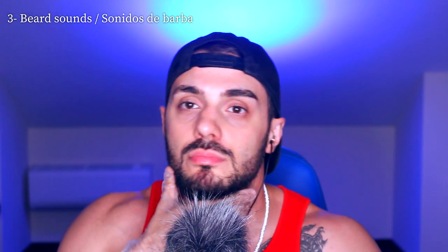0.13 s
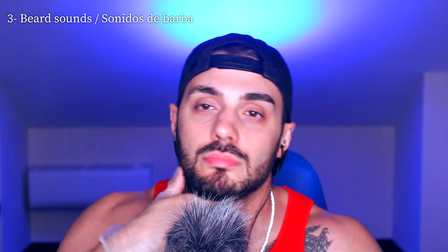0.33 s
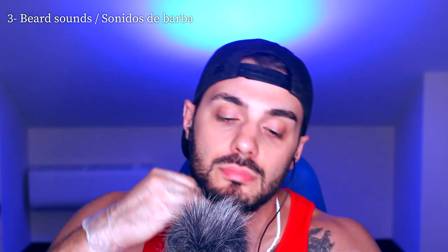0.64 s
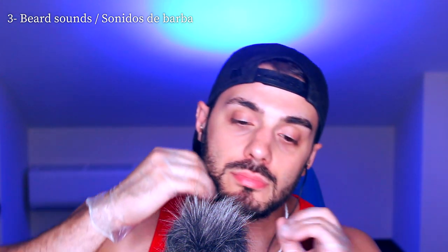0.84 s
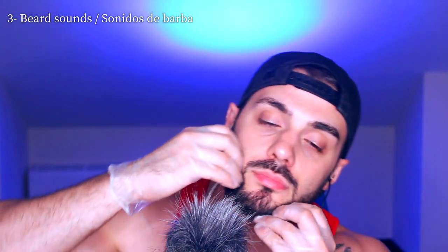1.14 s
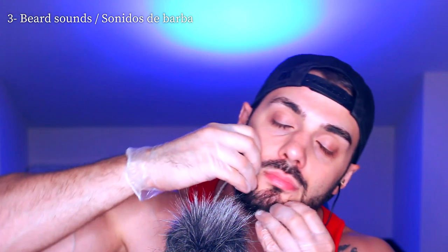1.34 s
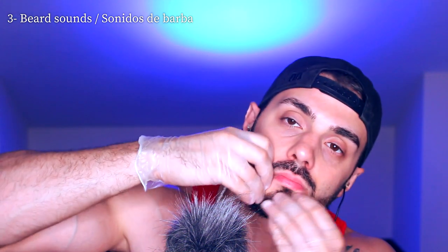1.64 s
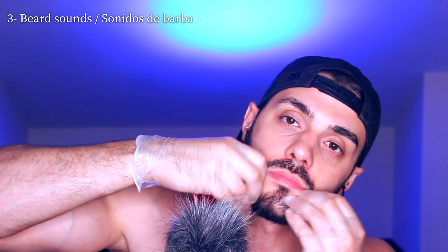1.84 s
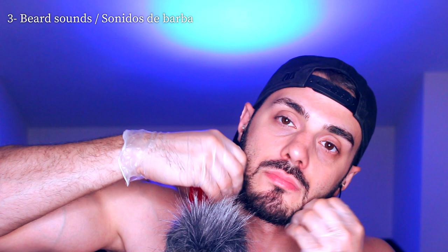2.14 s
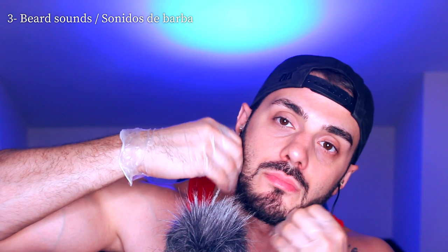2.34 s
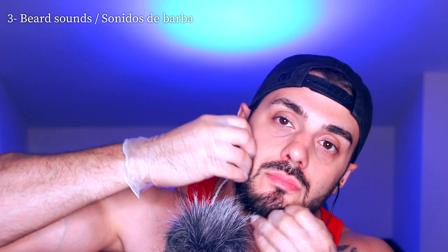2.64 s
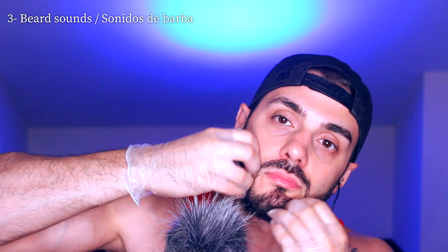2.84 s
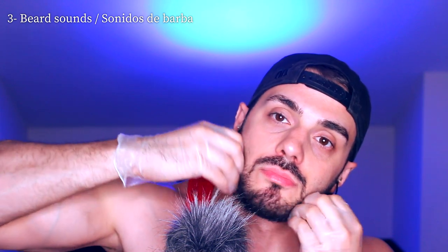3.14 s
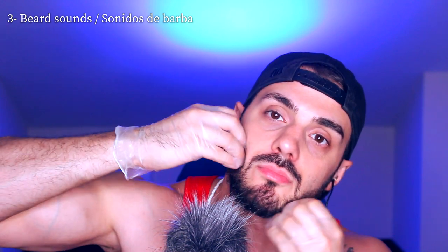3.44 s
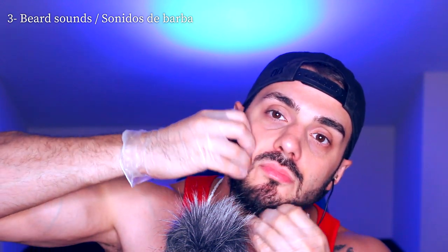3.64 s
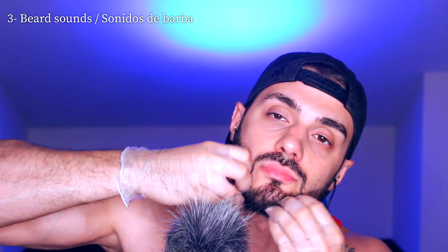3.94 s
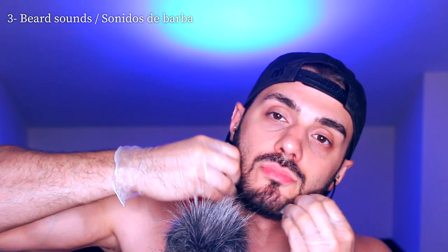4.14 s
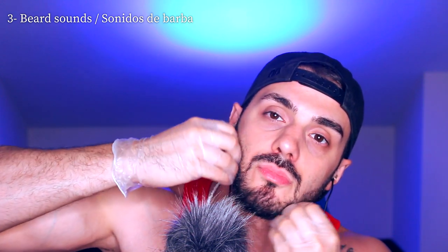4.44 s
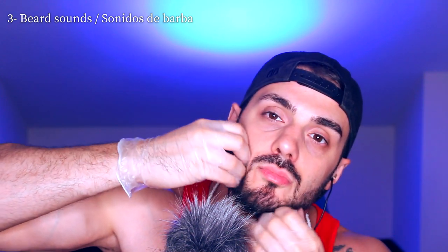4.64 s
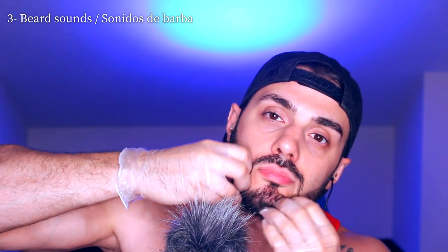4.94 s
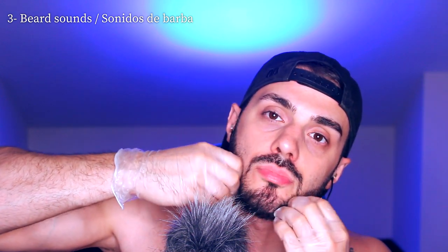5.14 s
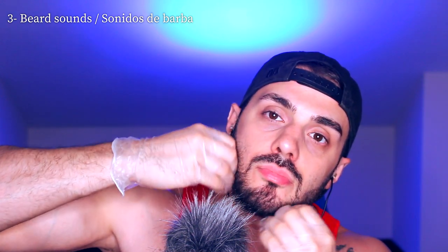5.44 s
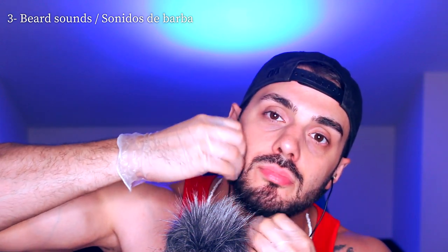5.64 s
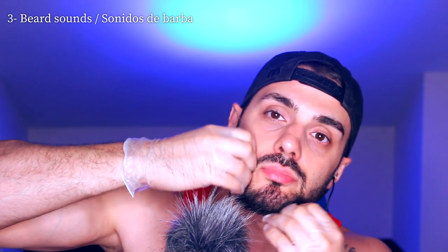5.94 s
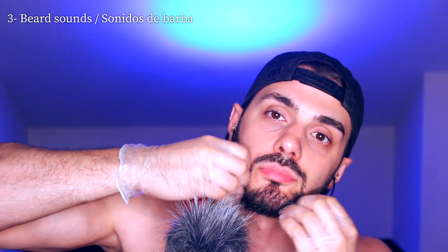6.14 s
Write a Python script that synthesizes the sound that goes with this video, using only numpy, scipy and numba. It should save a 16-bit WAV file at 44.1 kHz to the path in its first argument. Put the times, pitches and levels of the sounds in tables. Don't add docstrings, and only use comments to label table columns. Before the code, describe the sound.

Very close, dry beard scratching in quick strokes, bright bristly crackles and sharp tiny snaps leaning right, with faint glove rub and room hum beneath.

```python
import sys
import numpy as np
from scipy import signal
from scipy.fft import rfft, irfft
from scipy.io import wavfile
from scipy.ndimage import uniform_filter1d
from numba import njit

SR = 44100
rng = np.random.default_rng(int(sys.argv[2]) if len(sys.argv) > 2 else 0)


def master_out(mix):
    frames = np.transpose(np.atleast_2d(mix))
    ceiling = np.clip(frames, -1, 1)
    pcm = np.round(ceiling * 32767).astype(np.int16)
    wavfile.write(sys.argv[1], SR, pcm)


def voltage_ratio(level):
    return 10 ** (np.asarray(level, float) / 20)


N = 276948
T = np.arange(N) / SR

# (start_s, left_minus_right_db, glove_drag_db)
HANDS = [(0.0, -5, -57.5), (0.12, -1.5, -60), (0.79, -1, -61), (2.17, -11.5, -57.5), (2.73, -3.5, -59.5),
         (3.15, -10, -60.5), (3.39, -12.5, -55), (3.5, -11, -61.5), (3.76, -1, -59), (3.92, -4, -59),
         (4.2, -13, -59), (4.56, -4, -61), (4.83, -5.5, -56.5), (5.25, -10, -60.5), (5.51, -10, -58.5),
         (5.77, -2.5, -56), (6.21, -9, -60.5), (6.28, -11, -58)]
HAIR_LEAN = 1.35
USUAL_STROKE_DB = -34.5
UNDER_CHIN_S, UNDER_CHIN_DB = 1.05, -4


def curves(table):
    s, *columns = np.transpose(table)
    return [np.interp(T, s, column) for column in columns]


def walk(rate):
    k = int(SR / rate)
    held = np.repeat(rng.standard_normal(N // k + 1), k)
    return 0.74 * uniform_filter1d(uniform_filter1d(held, k), k)[:N]


def coloured(x, colour):
    hz, db = np.transpose(colour)
    log_hz = np.log(np.fft.rfftfreq(N, 1 / SR) + 1e-3)
    gain = voltage_ratio(np.interp(log_hz, np.log(hz), db, left=-99, right=-99))
    y = irfft(rfft(x) * gain, N)
    return y / np.sqrt(np.mean(y ** 2))


def wide_noise(colour, side, lag=0):
    mid, other = rng.standard_normal((2, N))
    left = np.roll(mid, lag) + side * other
    right = mid - side * other
    return coloured(np.array([left, right]), colour)


@njit
def rings(peak, hz, sharp, size, phase):
    out = np.zeros(N + 2000)
    for k in range(len(peak)):
        tau = sharp[k] * SR / (np.pi * hz[k])
        start = max(peak[k] - tau, 0.)
        s = 2j * np.pi * hz[k] / SR - 1 / tau
        i = int(start) + 1
        z = size[k] * np.exp(1 + 1j * phase[k] + s * (i - start)) / tau
        turn = np.exp(s)
        for j in range(min(500, int(9 * tau))):
            out[i + j] += z.imag * (i + j - start)
            z *= turn
    return out[:N]


def left_lag(s):
    return np.where(s > 1.1, 6.1, .7)


def heard(s, hz, sharp, db, pan_db, lag, echo_db, count=3):
    chance = rng.random((len(s), 1 + 4 * count)).T
    phase = 2 * np.pi * chance[0]
    left = rings(s * SR + lag, hz, sharp * 1.168, voltage_ratio(db + pan_db / 2), phase)
    right = rings(s * SR, hz, sharp, voltage_ratio(db - pan_db / 2), phase)
    out = np.array([left, right])
    for k in range(2 * count):
        late_s = 0.000182 + .003 * chance[1 + 2 * k] ** 2
        lean_db = (.5 - k % 2) * pan_db * 0.057
        size = voltage_ratio(db + lean_db + echo_db - 1200 * late_s)
        echo_phase = 2 * np.pi * chance[2 + 2 * k]
        out[k % 2] += rings((s + late_s) * SR, hz, sharp * 1.2, size, echo_phase)
    return out


def strokes():
    # (start_s, length_s, level_db, brightness_db)
    stroke_list = [(-0.13, 0.17, -42.5, 21), (0.121, 0.087, -36, 3), (0.32, 0.3, -37, 8),
                   (0.531, 0.076, -34, 1), (0.615, 0.077, -39, 0), (0.685, 0.11, -39.5, -0.5),
                   (0.774, 0.23, -38.5, 2), (1.057, 0.39, -39.5, 7), (1.26, 0.072, -38, 7),
                   (1.435, 0.13, -36.5, 1), (1.656, 0.26, -38, 1), (2.013, 0.17, -44.5, 10),
                   (2.156, 0.086, -39, -4), (2.303, 0.18, -41.5, -0.5), (2.448, 0.064, -36.5, -4),
                   (2.526, 0.17, -37.5, 1.5), (2.704, 0.23, -36, 1), (2.88, 0.22, -35, 3),
                   (3.02, 0.15, -38, 6), (3.163, 0.13, -36.5, -1), (3.446, 0.16, -35.5, 9),
                   (3.67, 0.28, -37.5, 1), (3.87, 0.16, -38, 4), (4.006, 0.18, -37, 5),
                   (4.199, 0.19, -39, -3), (4.4, 0.38, -36.5, 2), (4.779, 0.23, -35.5, 0.5),
                   (5.006, 0.25, -39.5, 7), (5.314, 0.27, -43, 5), (5.567, 0.21, -43.5, -7),
                   (5.823, 0.27, -35, -0.5), (6.067, 0.17, -37.5, 8)]
    attack_s, release_s = 0.066, 0.047
    resting_db, resting_bright_db = -44, 5
    s, length, db, bright_db = np.transpose(stroke_list)[:, :, None]
    t = T[::100]
    shape = np.clip(np.minimum((t - s) / attack_s, (s + length + release_s - t) / release_s), 0, 1)
    progress = np.clip((t - s) / (length + release_s), 0, 1)
    db = db + 4.5 * (np.sin(np.pi * progress) - .7)
    power = (voltage_ratio(db) * np.sin(shape * np.pi / 2)) ** 2
    resting = voltage_ratio(resting_db) ** 2
    total = power.sum(axis=0) + resting
    brightness = ((power * bright_db).sum(axis=0) + resting * resting_bright_db) / total
    return np.interp(T, t, 10 * np.log10(total)), np.interp(T, t, brightness)


def hum():
    # (pitch_hz, level_db)
    mains = [(100.0, -52), (200.0, -79), (300.0, -72), (76.4, -70), (153.0, -67)]
    # (pitch_hz, level_db, wander_hz)
    fan = [(458, -79, 2.61), (500.6, -75, 2.85), (627, -75, 2.1), (879, -78, 2.66)]
    tones = [(hz, db, .04) for hz, db in mains] + fan
    out = np.zeros(N)
    for hz, db, wander in tones:
        turns = np.cumsum(hz + wander * walk(3)) / SR
        out += np.sqrt(2) * voltage_ratio(db) * np.sin(2 * np.pi * turns)
    return out


def arm():
    # (push_s, level_db)
    pushes = [(0.11, -28), (0.36, -38), (0.5, -30), (0.77, -33), (1.06, -27), (1.32, -42), (1.48, -48),
              (1.65, -33), (1.87, -34), (2.13, -35), (2.57, -40), (2.81, -34), (3.11, -46), (3.34, -39),
              (3.63, -37), (3.84, -32), (4.05, -30), (4.31, -25), (4.68, -27), (4.93, -28), (5.17, -28),
              (5.4, -31), (5.66, -27), (5.91, -29), (6.18, -33)]
    s, db = np.transpose(pushes)
    times = np.r_[s[0] - .25, s, s[-1] + .27]
    turns = uniform_filter1d(np.interp(T, times, np.arange(len(s) + 2)), size=5000)
    level = voltage_ratio(uniform_filter1d(np.interp(T, s, db), size=4000))
    push = np.sqrt(2) * level * np.cos(2 * np.pi * turns)
    return push * voltage_ratio(np.array([[-.6], [.6]]))


def shifts():
    # (middle_s, spread_s, stand_shudder_db, cloth_db, palm_db)
    shift_list = [(0, 0.022, -10, 3, 4), (.15, 0.057, 6, 1, -0.5), (.33, 0.039, -6, 14, 2),
                  (.59, 0.12, 6, 9.5, 7.5), (1.0, 0.087, 3, 7, 1), (1.8, 0.36, -3, 4, 4),
                  (2.3, .05, 2, -2, -5), (2.5, 0.16, 0.5, -1, -0.5), (5.4, .15, 1, 2.5, -1),
                  (3.4, 0.3, 2, 3, -1), (5.0, 0.22, 1, -0.5, 1), (5.87, 0.15, 0, 3.5, 7),
                  (6.2, 0.12, -1, -2.5, -1)]
    s, spread, *lifts_db = np.transpose(shift_list)[:, :, None]
    swell = np.exp(-.5 * ((T - s) / spread) ** 2)
    return [(swell * db).sum(axis=0) for db in lifts_db]


def rub():
    # (pitch_hz, level_db)
    glove_colour = [(900, -32), (1300, -14), (1900, -5.5), (2500, -8), (4000, -7), (6000, -19)]
    palm_colour = [(420, -49), (600, -2), (900, 0.5), (1300, 0), (1800, -5)]
    cloth_colour = [(70, -6), (110, 1.5), (150, -1.5), (185, -0.5), (300, 0), (500, -4.5), (620, -9),
                    (850, -26)]
    stand_colour = [(9, -14), (14, 2), (24, -2.5), (33, 1), (42, -15), (55, -18), (80, -17.5), (130, -36)]
    glove_db = 5.5 + curves(HANDS)[1] + 0.55 * (strokes()[0] - USUAL_STROKE_DB)
    stand_db, cloth_db, palm_db = np.array(shifts()) + [[-52.5], [-60.7], [-63.36]]
    lean = np.array([[-1], [1]])
    drag = walk(50)
    glove = wide_noise(glove_colour, 0.71, lag=3.3) * voltage_ratio(glove_db + 2.7 * drag + 1.35 * lean)
    palm_flicker_db = 2.0 * drag + 2.5 * walk(30)
    palm = wide_noise(palm_colour, 0.45, lag=3.7) * voltage_ratio(palm_db + palm_flicker_db + 1.7 * lean)
    cloth = wide_noise(cloth_colour, 0.23) * voltage_ratio(cloth_db + 1.1 * walk(25.17) + 0.93 * lean)
    stand = wide_noise(stand_colour, 0.39) * voltage_ratio(stand_db + .5 * lean)
    return glove + palm + cloth + stand


def beard(count=70000):
    hair_hz = (2750, 4800, 7600, 13300, 14760)
    hair_db = (-32, 8, 8.5, 7, 13)
    when, pitch, ring, big, side, place = rng.random((count, 6)).T
    at = (when * (N - 40)).astype(int)
    s = at / SR
    level_db, bright_db = (c[at] for c in strokes())
    hz = hair_hz[0] * (hair_hz[-1] / hair_hz[0]) ** pitch
    log_hz, log_points = np.log(hz), np.log(hair_hz)

    coarse_db = -2.5 - 0.69 * (level_db - USUAL_STROKE_DB) - bright_db
    fine_db = 0.5 + 0.21 * bright_db + UNDER_CHIN_DB * (s < UNDER_CHIN_S)
    coarse = np.interp(log_hz, log_points, [1, 1, 0, 0, 0])
    fine = np.interp(log_hz, log_points, [0, 0, 0, 1, 1])
    colour_db = np.interp(log_hz, log_points, hair_db) + coarse * coarse_db + fine * fine_db

    sharp = 1.1 + (1.6 + 4.5 * ring ** 2) * big ** .2
    size_db = np.minimum(-(3.8 - 1.2 * pitch ** 2) * np.log(big), 14)
    patch = sum(walk(14)[at] * np.cos(np.pi * k * pitch) for k in (2, 3, 5))
    size_db = size_db + .6 * patch + 1.6 * walk(180)[at]
    energy_db = 10 * np.log10(sharp * SR / hz)

    pan_db = HAIR_LEAN * curves(HANDS)[0][at] * (hz / 9000) ** 0.37 + 9 * (side - .5)
    lag_spread = np.interp(s, [.9, 1.4], [.6, 1.5])
    lag = np.interp(s, [.9, 1.4], [.6, 6.1]) - lag_spread * ((place < .35) + 1.1 * place)
    db = level_db - 5.0 + colour_db + size_db - energy_db
    return heard(s, hz, sharp, db, pan_db, lag, echo_db=-10)


def ticks(count=220):
    when, pitch, ring, big, side = rng.random((count, 5)).T
    at = (when * (N - 40)).astype(int)
    s = at / SR
    db = strokes()[0][at] + 9 - 1.5 * np.log(big).clip(-2)
    db = db + 2 * UNDER_CHIN_DB * pitch * (s < UNDER_CHIN_S)
    db = db + 3 * (pitch - .5)
    pan_db = HAIR_LEAN * curves(HANDS)[0][at] + 8 * (side - .5)
    return heard(s, 6000 * 2.0 ** pitch, .9 + 1.2 * ring, db, pan_db, left_lag(s), echo_db=-14)


def snaps():
    # (peak_s, peak_db, ring_hz)
    middling_catches = [(0.1947, -23, 10700), (0.219, -24, 7400), (0.5476, -23, 7900), (0.5797, -23, 8800),
                        (0.5937, -20, 7500), (0.7241, -22, 8200), (0.8116, -23, 8400), (0.8744, -22, 12600),
                        (0.9136, -22, 8700), (0.9629, -21, 8200), (0.9996, -21, 9800), (1.1046, -25, 9800),
                        (1.1331, -24, 12500), (1.149, -24, 10000), (1.245, -24, 9100), (1.2528, -26, 10700),
                        (1.2973, -27, 10400), (1.3149, -27, 10200), (1.4256, -28, 10300), (1.4871, -25, 10000),
                        (1.71, -24, 8000), (1.7582, -25, 10800), (1.7976, -21, 11300), (1.8227, -23, 9100),
                        (1.8549, -24, 12600), (1.8853, -25, 12100), (1.9219, -25, 11100), (2.0531, -23, 10100),
                        (2.0596, -29, 9600), (2.0711, -28, 11200), (2.0839, -26, 9900), (2.1249, -27, 9200),
                        (2.1293, -28, 10100), (2.2265, -24, 9200), (2.2442, -26, 11100), (2.3546, -27, 9400),
                        (2.405, -23, 9900), (2.5352, -24, 10000), (2.685, -24, 8700), (2.7937, -20, 8000),
                        (2.8144, -22, 12000), (2.853, -23, 7900), (2.9041, -25, 9300), (2.9134, -21, 10000),
                        (2.9273, -25, 10300), (2.9706, -23, 10100), (2.9812, -19, 11000), (3.0034, -21, 9400),
                        (3.079, -24, 9800), (3.1017, -23, 9200), (3.1355, -24, 10700), (3.1742, -25, 10500),
                        (3.2179, -22, 8000), (3.243, -21, 7700), (3.2533, -24, 9800), (3.2602, -22, 8000),
                        (3.2844, -23, 11400), (3.3094, -28, 10500), (3.4221, -27, 9000), (3.4465, -25, 10500),
                        (3.5039, -24, 10800), (3.5306, -21, 10100), (3.5408, -22, 11300), (3.5673, -23, 10200),
                    (3.5736, -23, 11400), (3.5793, -23, 10800), (3.5898, -22, 12500), (3.6498, -28, 10400),
                    (3.8303, -22, 9100), (3.9939, -25, 8800), (4.0318, -20, 9400), (4.0568, -29, 10000),
                    (4.125, -21, 10100), (4.137, -24, 9300), (4.2269, -25, 9100), (4.2983, -24, 10800),
                    (4.3271, -23, 9200), (4.3347, -22, 10500), (4.4029, -22, 9700), (4.4634, -25, 10100),
                    (4.4669, -21, 10200), (4.4788, -25, 10500), (4.5034, -19, 7700), (4.5276, -19, 9200),
                    (4.6181, -23, 9600), (4.6473, -20, 9700), (4.6531, -25, 11200), (4.6837, -24, 11200),
                    (4.7217, -22, 8500), (4.7328, -20, 11700), (4.7614, -22, 7000), (4.7682, -28, 11000),
                    (4.8229, -24, 6800), (4.8736, -26, 12700), (4.9231, -22, 10200), (5.1137, -26, 9000),
                    (5.1926, -27, 11800), (5.2577, -26, 9200), (5.2688, -31, 11100), (5.2825, -28, 9900),
                    (5.3152, -33, 9600), (5.3401, -28, 10700), (5.3862, -28, 10600), (5.6571, -25, 7700),
                    (5.6737, -20, 9100), (5.7439, -23, 8000), (5.8238, -24, 7400), (5.8714, -25, 11800),
                    (5.8999, -21, 11200), (5.9274, -23, 10700), (5.9907, -22, 8100), (6.0112, -20, 10300),
                    (6.056, -22, 9000), (6.1234, -25, 9000), (6.1519, -23, 10000), (6.1999, -22, 9400),
                    (6.2208, -29, 11500), (6.2473, -25, 10900), (6.2539, -23, 8900), (6.2627, -25, 11000)]
    # (peak_s, peak_db, ring_hz, left_minus_right_db)
    strong = [(0.5588, -20, 8600, -3), (0.5747, -19, 8000, -3), (0.6783, -17, 7200, 0),
              (0.7134, -18, 6900, -3), (0.7383, -19, 6800, 0), (0.8255, -20, 8900, -4),
              (1.1145, -22, 8800, -11), (1.2405, -26, 9400, -15), (1.3564, -20, 11000, -6),
              (1.4595, -21, 7900, -10), (1.5331, -19, 8500, -6), (1.6898, -13, 12500, -8),
              (2.1096, -22, 8700, -17), (2.2054, -22, 10100, -19), (2.2152, -19, 10900, -10),
              (2.2848, -19, 10100, -10), (2.3336, -20, 8900, -9), (2.4012, -19, 9300, -8),
              (2.4128, -22, 10900, -12), (2.4884, -20, 11000, -12), (2.4949, -18, 8800, -9),
              (2.9389, -11, 9300, 0), (3.1171, -18, 9400, -15), (3.295, -20, 8800, -11),
              (3.5004, -14, 10600, -12), (3.5193, -13, 10000, -13), (3.5519, -17, 10700, -16),
              (3.8944, -21, 13100, -17), (3.9875, -15, 9400, -8), (4.0715, -17, 11100, -15),
              (4.1154, -11, 9700, -13), (4.1519, -21, 8900, -15), (4.1891, -18, 9900, -15),
              (4.3211, -23, 11100, -20), (4.434, -23, 9600, -18), (4.455, -22, 9400, -18),
              (4.6279, -18, 9700, -9), (4.7437, -19, 9200, -6), (4.9074, -18, 10700, -7),
              (5.0828, -25, 12000, -18), (5.1826, -20, 9500, -14), (5.23, -24, 9800, -15),
              (5.5219, -24, 10800, -13), (5.562, -21, 11700, -10), (5.6677, -24, 11500, -13),
              (6.0083, -19, 10500, -11), (6.0258, -12, 8800, -10), (6.0348, -17, 9100, -10)]
    s, db, hz = np.transpose(middling_catches)
    catches = s, db, hz, 1.3 * curves(HANDS)[0][(s * SR).astype(int)]
    s, db, hz, pan_db = np.hstack([np.transpose(strong), catches])
    sharp = np.clip(1.8 * voltage_ratio(1.5 * rng.standard_normal(len(s))), .6, 6)
    lag = left_lag(s)
    ring = heard(s, hz, sharp, db + 2, pan_db, lag, echo_db=-15)
    crack_hz = np.minimum(hz * 1.4, 14500)
    return ring + heard(s, crack_hz, sharp, db - 10, pan_db, lag, echo_db=-16)


def knock():
    # (pitch_hz, level_db, time_to_fall_60_db_s)
    modes = [(226, -8, 0.07), (285, 4.5, 0.045), (330, 4, 0.024), (396, -3, 0.05), (452, -4, 0.35),
             (480, 1, .04), (507.5, -10, 0.35), (660, -14, 0.15), (780, -3, .015), (1050, -5, 0.025),
             (1250, -5, .015), (1500, -7, .012)]
    knock_s, knock_db = .2953, -35
    out = np.zeros(N)
    for delay_s, bounce_db in ((0, 0), (.0145, -6)):
        t = np.maximum(T - knock_s - delay_s, 0)
        push = 1 - np.exp(-t / 0.0011)
        for hz, mode_db, t60 in modes:
            level = voltage_ratio(knock_db + bounce_db + mode_db - 60 * t / t60)
            out -= level * np.sin(2 * np.pi * hz * t) * push
    return signal.sosfilt(signal.butter(2, 190, "high", fs=SR, output="sos"), out)


def creases():
    # (peak_s, peak_db, pitch_hz, pitch_over_bandwidth)
    pops = [
        (.578, -54, 700, 2.8),
        (.59, -48, 900, 2.5),
        (1.044, -50, 805, 3.5),
        (2.533, -48, 1590, 2.2),
        (3.42, -51, 2150, 2),
        (4.523, -59, 1000, 4),
        (4.551, -51, 1900, 3.3),
        (4.625, -43, 2190, 1.8),
        (5.4657, -41, 1910, 1.7),
        (5.6176, -43, 1590, 1.5),
    ]
    s, db, hz, sharp = np.transpose(pops)
    return heard(s, hz, np.clip(sharp, 1, 5), db, -1.2, left_lag(s), echo_db=5.0)


def sway():
    middle_s, spread_s, pitch_hz, level_db = 2.55, 0.24, 31.9, -47
    swell = np.exp(-.5 * ((T - middle_s) / spread_s) ** 2)
    return np.sqrt(2) * voltage_ratio(level_db) * swell * np.sin(2 * np.pi * pitch_hz * T)


def scene():
    high_pass = signal.butter(2, 3000, "high", fs=SR, output="sos")
    hairs = signal.sosfilt(high_pass, beard() + snaps() + ticks())
    return hairs + creases() + rub() + arm() + sway() + hum() + knock()


def band_limit(x):
    return signal.sosfilt(signal.butter(12, 16860, fs=SR, output="sos"), x)


def record(dry):
    sharpest = (1.69, 4.115)
    f = np.fft.rfftfreq(N, 1 / SR)
    spectrum = rfft(dry)
    low = irfft(spectrum * (f < 15730), N)
    top = irfft(spectrum * ((f > 15730) & (f < 16600)), N)
    keep = sum(np.exp(-((T - t) / .003) ** 2) for t in sharpest)
    return band_limit(low + top * keep)


dry = scene()
out = record(dry)
master_out(out)
```